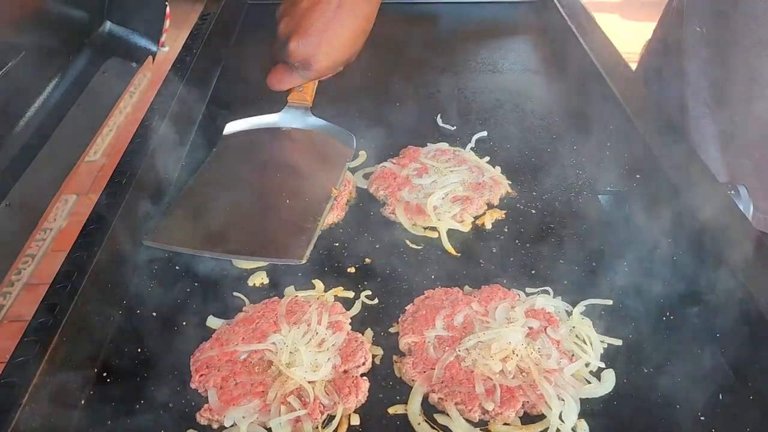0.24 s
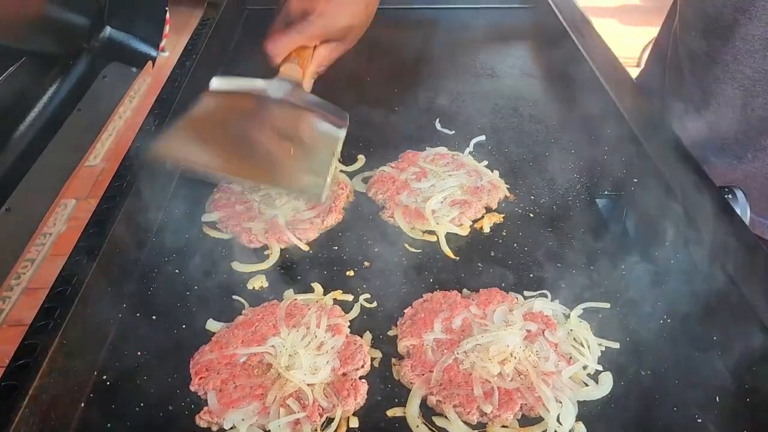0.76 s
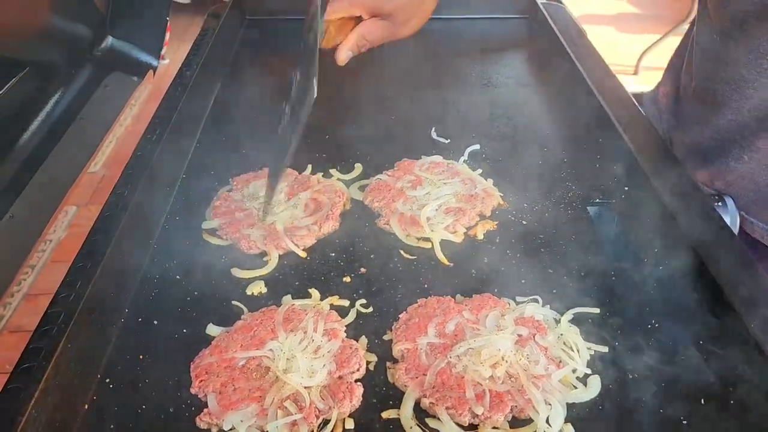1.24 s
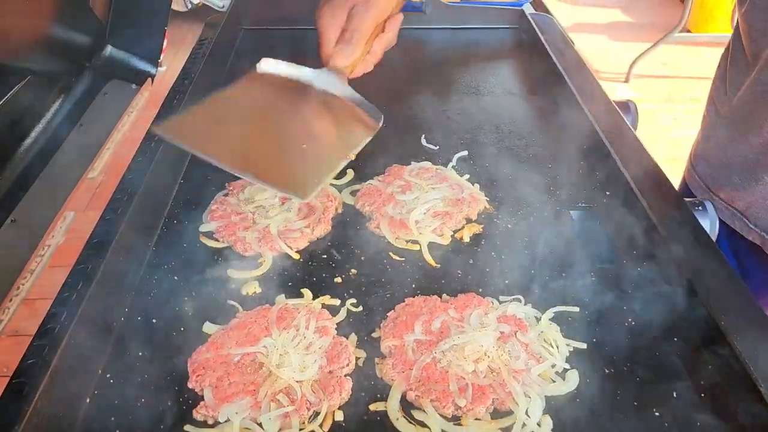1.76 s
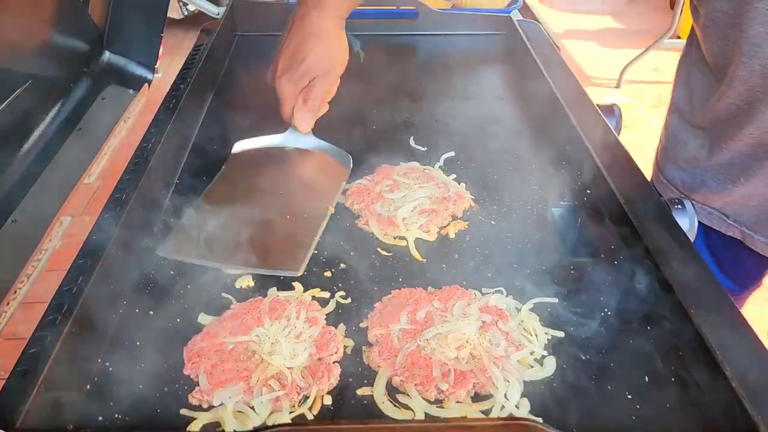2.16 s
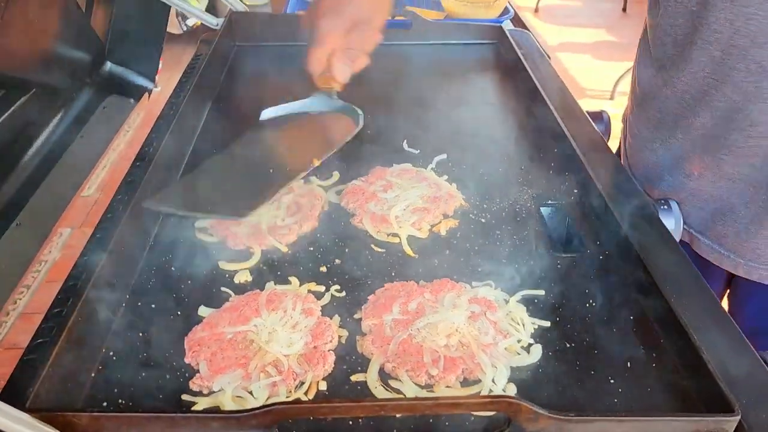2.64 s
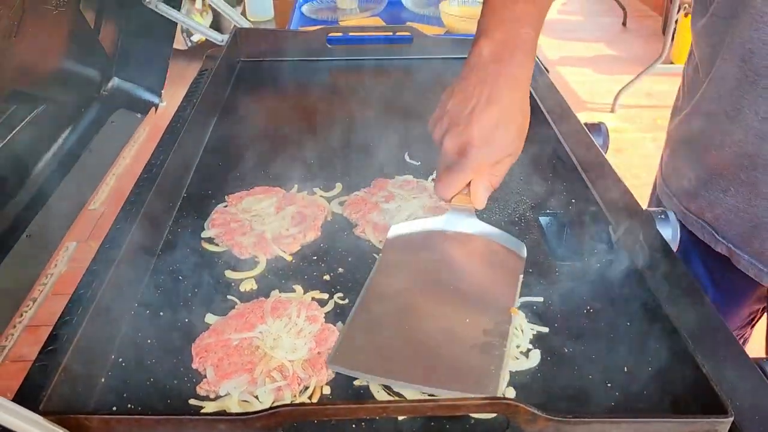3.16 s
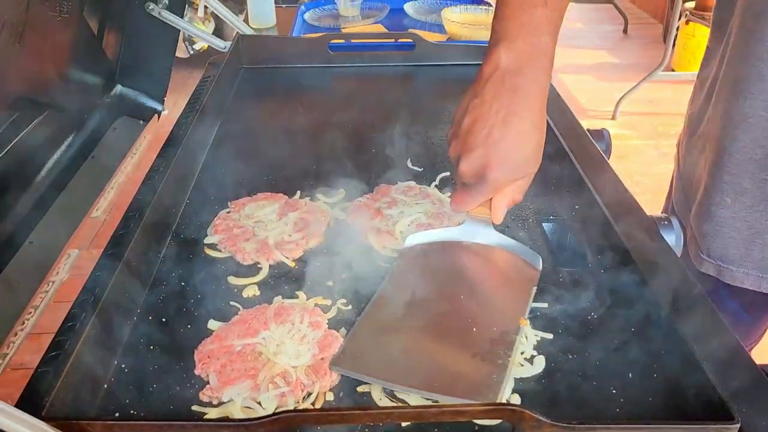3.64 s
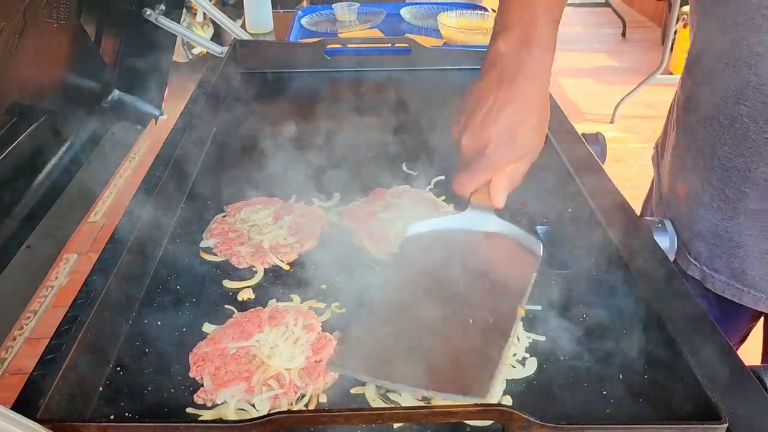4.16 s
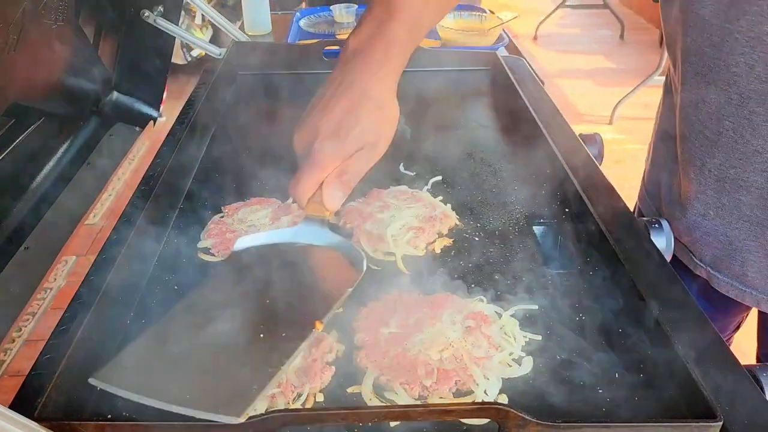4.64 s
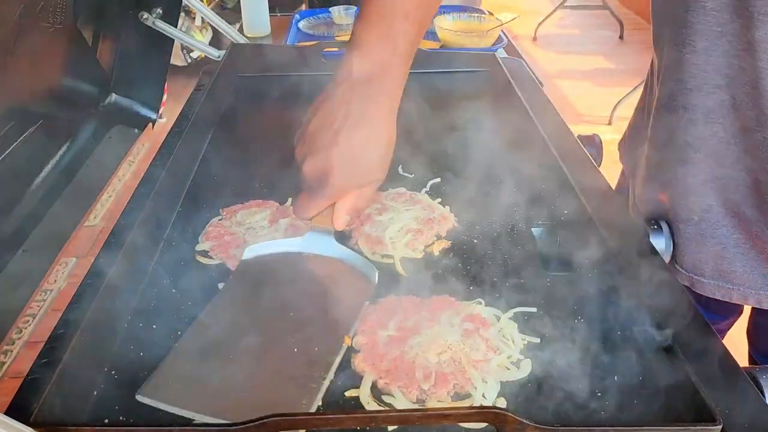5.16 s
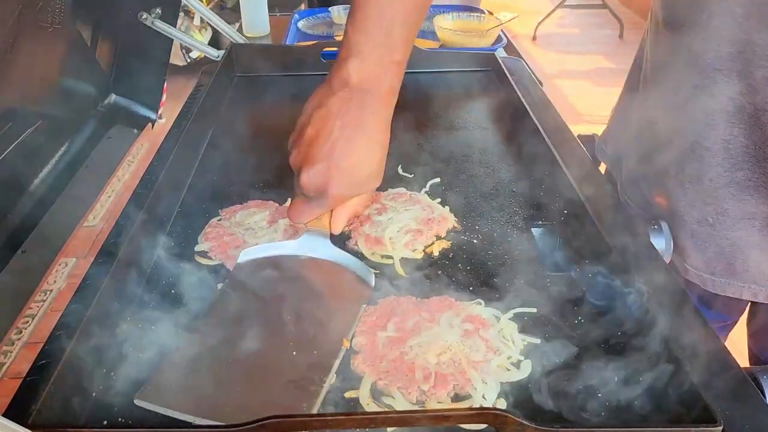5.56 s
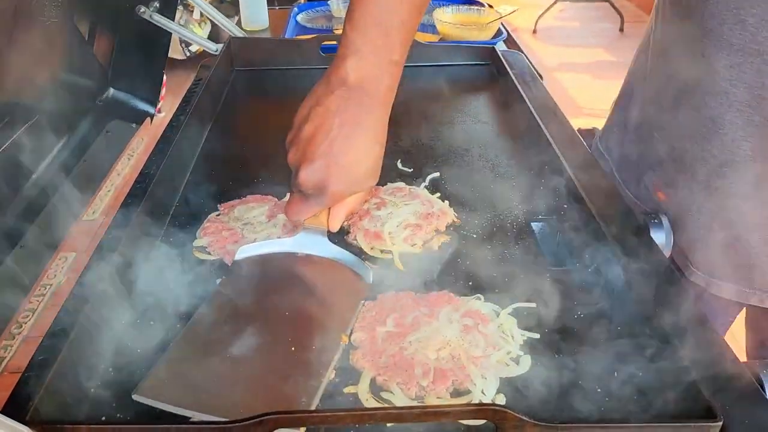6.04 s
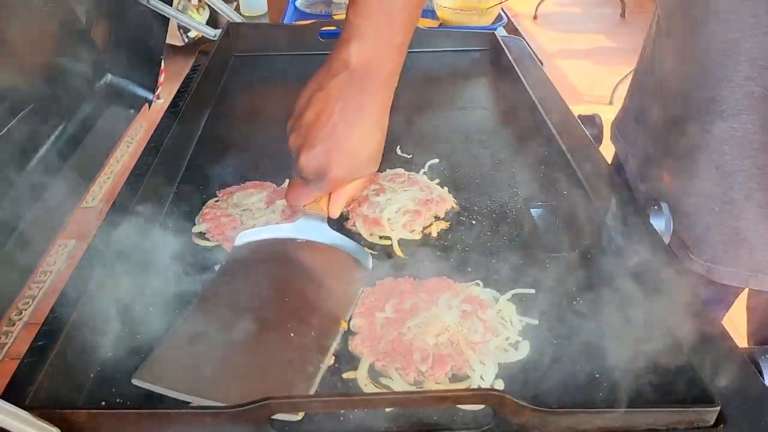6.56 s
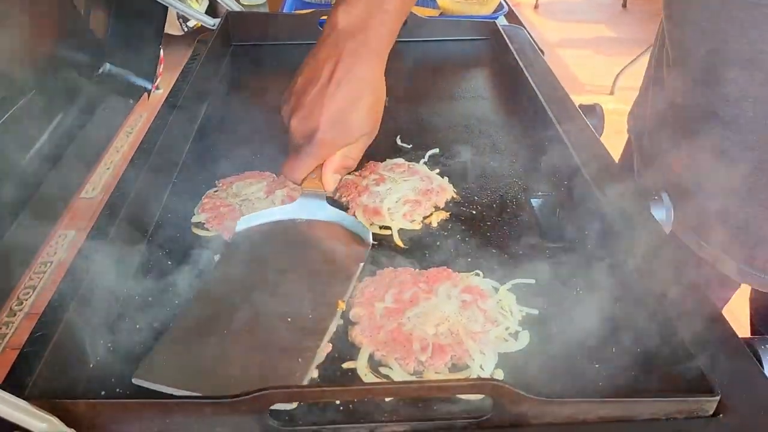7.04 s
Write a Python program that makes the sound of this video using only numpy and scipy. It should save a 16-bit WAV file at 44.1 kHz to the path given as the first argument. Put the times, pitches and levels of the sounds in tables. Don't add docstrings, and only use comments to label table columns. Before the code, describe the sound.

Dense, bright frying hiss over a faint low burner rumble; a metal spatula knocks the griddle sharply once, rings and chatters briefly.

```python
import sys
import numpy as np
from scipy import signal
from scipy.fft import rfft, irfft, next_fast_len
from scipy.io import wavfile
from scipy.ndimage import uniform_filter1d

SR = 44100
rng = np.random.default_rng(int(sys.argv[2]) if len(sys.argv) > 2 else 0)


def master_out(mix):
    frames = np.transpose(np.atleast_2d(mix))
    ceiling = np.clip(frames, -1, 1)
    pcm = np.round(ceiling * 32767).astype(np.int16)
    wavfile.write(sys.argv[1], SR, pcm)


def volts_from_db(level):
    exponent = np.asarray(level, float) / 20
    return 10 ** exponent


N = 321489

# level_db, vigour_share, all_trapped_db, full_force_db, cooking_db_per_s
BUBBLE_RESPONSE = [
    (-36, 0.58, 3.5, 1.3, 0.06),
    (-44, 1.1, 12, 2.04, -0.05),
    (-25, 1.06, -0.37, 0.7, -0.01),
    (-28, 0.38, 0, -0.3, -0.35),
]


def evened(x):
    return x / np.sqrt(np.mean(np.atleast_2d(x).mean(0) ** 2) + 1e-20)


def read_spectrum(points, hz):
    point_hz, value = np.transpose(points)
    return np.interp(np.log(hz + 1), np.log(point_hz + 1), value)


def curves(rows):
    s, *columns = np.transpose(rows)
    return [np.interp(np.arange(N) / SR, s, column) for column in columns]


def wander(fast_hz, slow_hz=4.5):
    t = np.arange(0, N + 64, 64) / SR
    rates_hz = np.geomspace(slow_hz, fast_hz, num=40)
    drift = sum(np.sin(2 * np.pi * (rate * t + rng.random())) for rate in rates_hz)
    return np.interp(np.arange(N) / SR, t, evened(drift))


def resonate(x, hz, width_hz):
    carrier = np.exp(2j * np.pi * np.cumsum(hz) / SR)
    r = np.exp(-np.pi * width_hz / SR)
    return 2 * (carrier * signal.lfilter([1 - r], [1, -r], x / carrier)).real


def scatter(t60, wet_db):
    t = np.arange(2048) / SR
    tail = rng.standard_normal((2, 2048)) * volts_from_db(-60 * t / t60) * (t > .0004)
    tail -= uniform_filter1d(tail, size=61)
    tail *= volts_from_db(wet_db) / np.linalg.norm(tail, axis=1, keepdims=True)
    return tail + (t == 0)


def pressing():
    # down_s, up_s, force (0-1), gap_hz
    presses = [
        (-.2, .66, 0.46, 1930),
        (1.95, 2.525, 1, 2160),
        (3.245, 4.06, 1.05, 1640),
        (5.02, 6.9, 0.43, 1720),
    ]
    lean_s, open_hz = 0.11, 1740
    t = np.arange(N) / SR
    down, up, force, gap_hz = np.transpose(presses)[:, :, None]
    held = np.clip(np.minimum(t - down, up - t + lean_s) / lean_s, 0, 1)
    return (held * force).sum(0), open_hz + (held * (gap_hz - open_hz)).sum(0)


def boiling():
    # start_s, vigour_db, trapped (share of steam under meat and blade, 0-1)
    frying_course = [(0.0, -22.3, 0.52), (.55, -23, 0.4), (.8, -24.5, .25), (1.2, -25, 0.23),
                     (1.9, -25, 0.13), (2.5, -25, 0.23), (3.12, -29, 0.55), (3.27, -27, 1),
                     (3.6, -23, 0.83), (4.03, -24, 0.85), (4.3, -25.5, 0.82), (4.74, -27.5, 0.5),
                     (4.96, -29, 0.8), (5.14, -25.5, 0.9), (5.32, -22, 0.9), (6.05, -23, 0.74),
                     (6.6, -25, .95), (7.29, -25.5, 0.7)]
    usual_db = -25
    vigour_db, trapped = curves(frying_course)
    force, t = pressing()[0], np.arange(N) / SR
    return [level_db + share * (vigour_db - usual_db) + trapped_db * trapped + force_db * force + db_per_s * t
            for level_db, share, trapped_db, force_db, db_per_s in BUBBLE_RESPONSE]


def shaking():
    # time_s, thud_db, plate_db, length_s
    jolts = [(.2, -53, -51.5, .15), (0.378, -55, -39, .008), (2.115, -51, -50, 0.085),
             (3.36, -57, -50, .06), (4.444, -50, -51, 0.055), (4.638, -37.5, -39.5, 0.051),
             (4.748, -48, -35.5, .04), (4.886, -46, -43, 0.065), (5.048, -44, -49.5, 0.11),
             (5.217, -50, -57, .08)]
    roar_db, drone_level_db = -51, -54.5
    s, thud_db, plate_db, length = np.transpose(jolts)[:, :, None]
    bell = np.exp(-2 * ((np.arange(N) / SR - s) / length) ** 2)
    drone_db = drone_level_db + (boiling()[0] - BUBBLE_RESPONSE[0][0]) + pressing()[0]
    thud_power = (volts_from_db(2 * thud_db) * bell).sum(0)
    plate_power = (volts_from_db(2 * plate_db) * bell).sum(0)
    return volts_from_db(roar_db), np.sqrt(volts_from_db(2 * drone_db) + plate_power), np.sqrt(thud_power)


def burner():
    # freq_hz, level_db
    roar_shape = [(22, -17), (40, 1.5), (65, -5.5), (100, 2.5), (125, -1), (160, -12.5), (220, -23)]
    drone_shape = [(110, -25), (170, -1.5), (300, 1), (400, -3), (560, -0.5), (750, -5.5)]
    thud_shape = [(30, -11), (60, -2), (100, 0.5), (130, 1.5), (170, -10.5), (230, -28.5)]
    hz = np.fft.rfftfreq(N, 1 / SR)
    roar, drone, thud = shaking()
    flame, flame_side, plate, plate_side = rfft(rng.standard_normal((4, N)))

    def pair(centre, side, shape):
        ports = np.array([centre + side, centre - side])
        return evened(irfft(ports * volts_from_db(read_spectrum(shape, hz)) * (hz < 1500), N))

    return (roar * pair(flame, 0.14 * flame_side, roar_shape)
            + drone * pair(plate, 0.27 * plate_side, drone_shape)
            + thud * pair(plate, 0.075 * plate_side, thud_shape))


def clatter():
    start_s, level_db, t60, width_hz = 4.553, -24, 0.39, 1600
    t = np.maximum(np.arange(N) / SR - start_s, 0)
    grit = (rng.random(N) < 2500 / SR) * rng.standard_normal(N)
    hz = 1500 * (0.51 + 0.69 * np.exp(-t / .07))
    body = resonate(resonate(grit, hz, width_hz), hz, width_hz)
    dying = volts_from_db(level_db - 60 * t / t60) * (t > 0) * evened(body)
    return signal.oaconvolve(dying[None], scatter(t60=0.046, wet_db=1), axes=1)[:, :N]


def ring(modes, rise_s):
    t = np.arange(11000) / SR
    hz, db, t60 = np.transpose(modes)[:, :, None]
    luck = rng.uniform(0.27, 1, (len(modes), 1)) * rng.choice([-1., 1.], (len(modes), 1))
    partials = luck * volts_from_db(db - 60 * t / t60) * np.sin(2 * np.pi * hz * t)
    return partials.sum(0) * (1 - np.exp(-t / rise_s))


def spatula():
    # time_s, tick_db, blade_db, plate_db
    knocks = [(3.873, -50, -54, -39), (4.5527, -1.5, -23, -49), (4.559, -9, -20.5, -24.5),
              (4.567, -6, -23, -31), (4.574, -19, -29, -36), (4.582, -22, -33, -30), (4.611, -30, -30, -31),
              (4.628, -32, -27.5, -23.5), (4.645, -34, -51, -31), (4.650, -32, -39, -18.5),
              (4.666, -36, -46, -25), (4.69, -30, -36, -24.5), (4.755, -28, -33, -29),
              (4.7782, -18, -39, -29), (4.786, -30, -36, -36)]
    # freq_hz, level_db, t60_s
    plate_modes = [(201, -20, 0.091), (260, -11, 0.11), (300.5, -1, 0.34), (322, -4, 0.12), (410, -17, .1),
                   (462, -6.5, 0.2), (518, -5.5, 0.22), (730, -18, .08), (810, -8, 0.086),
                   (863, -7.5, 0.19), (919, 3, 0.088), (1033, -5, 0.092), (1080, -5, .1)]
    blade_modes = [(1207, -9.5, .2), (1480, -18, .2), (1550, -6, 0.43), (1702, 1, 0.086), (1770, 0, 0.08),
                   (1950, -3, 0.1), (2114, -4.5, 0.24), (2340, -3.5, 0.24), (2770, 0, 0.093),
                   (3350, -9, 0.047)]
    edge_modes = [(4700, -22, 0.05), (5750, -14, 0.05), (5930, -10, 0.045), (7130, -8, 0.052),
                  (7840, -18, 0.039)]
    out, t = np.zeros(N), np.arange(11000) / SR
    for s, tick_db, blade_db, plate_db in knocks:
        crack = uniform_filter1d(rng.standard_normal(len(t)), size=3) * np.exp(-t / 0.0021)
        click = np.sin(2 * np.pi * 5600 * t) * np.exp(-t / 0.00039)
        tick = click + 0.5 * crack + ring(edge_modes, rise_s=.0003)
        sound = volts_from_db(tick_db) * tick
        sound += volts_from_db(blade_db) * ring(blade_modes, rise_s=0.0002)
        sound += volts_from_db(plate_db) * ring(plate_modes, rise_s=0.0032)
        out[round(s * SR):][:len(t)] += sound
    return signal.oaconvolve(out[None], scatter(t60=0.071, wet_db=-1), axes=1)[:, :N]


def bursts(per_s, spread_db, spots=8):
    lag_spread_s = .00004
    height = volts_from_db(spread_db * np.minimum(rng.exponential(1, N), 5)) * rng.choice([-1., 1.], N)
    pops = height * (rng.random(N) < per_s / SR)
    spot, pair = rng.integers(0, spots, N), np.zeros((2, N))
    for k, place in enumerate(np.linspace(-1, 1, num=spots)):
        here = pops * (spot == k)
        pair += [np.roll(here, round(place * lag_spread_s * SR)), here]
    return pair


def reflections(pops, t60):
    decay = np.exp(-2 * np.log(1000) / (t60 * SR))
    power = signal.lfilter([1 - decay], [1, -decay], pops[1] ** 2)
    return np.sqrt(power) * rng.standard_normal((2, N))


def frying():
    # low_hz, high_hz, bursts_per_s, spread_db, clumping_db
    sizes = [
        (510, 3310, 9000, 2.5, 0.24),
        (2470, 4130, 9000, 2, 0.84),
        (4200, 10600, 14000, 3, 0.42),
        (10000, 17200, 26000, 4.5, 1),
    ]
    # freq_hz, level_db
    left_port = [(400, -23), (1000, -12), (1500, -5.5), (1950, -5.5), (3750, -10), (5300, -0.5), (6300, -4),
                 (7350, -4.5), (8100, -16), (9000, -13.5), (10200, -9.5), (10900, -12.5), (12500, -10.5),
                 (14700, -8.5)]
    right_port = [(400, -24), (1000, -10), (1600, -4), (2900, -11), (4400, -5), (5500, -3.5), (6800, -5),
                  (7400, -0.5), (8000, -3), (8500, -2.5), (10600, -13), (11700, -8.5), (14500, -7.5),
                  (15500, -6)]
    # freq_hz, lead_rad
    left_leads = [(100, 2.4), (860, 0.15), (1600, 1.96), (2400, 0.39), (3050, 4), (3500, 5.23), (4200, 5.6),
                  (4900, 8.9), (6200, 8.42), (7750, 8.5), (8600, 5.1), (10900, 13.4), (13100, 13.6),
                  (14700, 20.7)]
    # start_s, bubbles_left_right_db, spray_left_right_db
    aim = [(0, 0.5, -3), (2.1, 1.3, -1), (3.0, 1.1, 1.5), (3.5, 1, 1), (5.6, 1, 0), (7.29, .9, 0.5)]
    levels_db, (pan_db, spray_pan_db) = boiling(), curves(aim)
    force, hollow_hz = pressing()
    hollow = 0.12 + (0.65 - 0.12) * force
    small_hz = 5970 + 120 * np.arange(N) / SR - 300 * force
    size = next_fast_len(N + 4096)
    hz = np.fft.rfftfreq(size, 1 / SR)
    ports = volts_from_db(np.array([read_spectrum(left_port, hz), read_spectrum(right_port, hz)])).astype(complex)
    ports[0] *= np.exp(1j * read_spectrum(left_leads, hz))
    wet = volts_from_db(0.5) * hz / np.hypot(hz, 1100)
    surge_db = 0.34 * wander(60)
    out = np.zeros((2, N))
    for k, ((low_hz, high_hz, per_s, spread_db, clump_db), db) in enumerate(zip(sizes, levels_db)):
        band = np.sqrt(1 / (1 + (low_hz / (hz + 1)) ** 20) / (1 + (hz / high_hz) ** 20))
        pops = bursts(per_s, spread_db) * volts_from_db(surge_db + clump_db * wander(40))
        heard = rfft(pops, size) + wet * rfft(reflections(pops, t60=0.037), size)
        sound = irfft(heard * band * ports, size)[:, :N]
        if k == 0:
            sound += hollow * resonate(sound, hollow_hz, width_hz=710)
        if k == 2:
            sound += 0.95 * resonate(sound, small_hz, width_hz=2500)
        side_db = spray_pan_db if k == 3 else pan_db
        out += evened(sound) * volts_from_db(db + np.outer([.5, -.5], side_db - side_db.mean()))
    return out


def scene():
    return frying() + burner() + spatula() + clatter()


def top_cut(x):
    return signal.sosfilt(signal.butter(12, 17090, fs=SR, output="sos"), x)


def record(dry):
    soft = np.tanh(dry / 1.571) * 1.629
    low_pass = signal.firwin(767, 15790, window=("kaiser", 9), fs=SR)
    mix = signal.oaconvolve(soft, low_pass[None], "same", axes=1)
    return top_cut(mix)


dry = scene()
out = record(dry)
master_out(out)
```